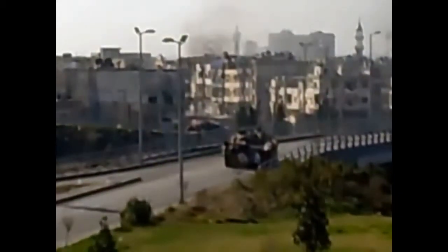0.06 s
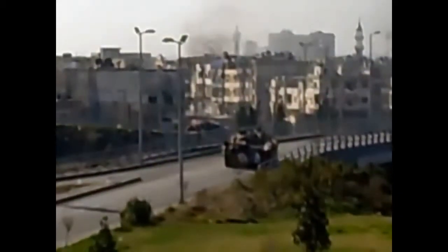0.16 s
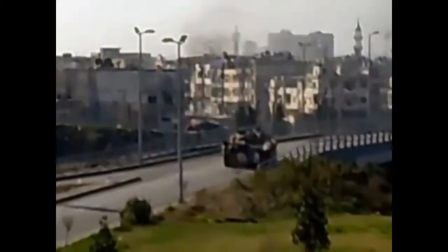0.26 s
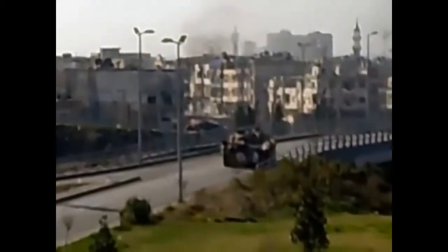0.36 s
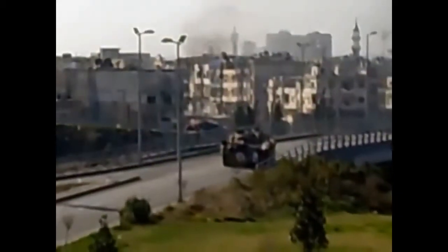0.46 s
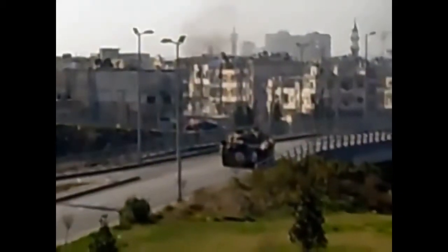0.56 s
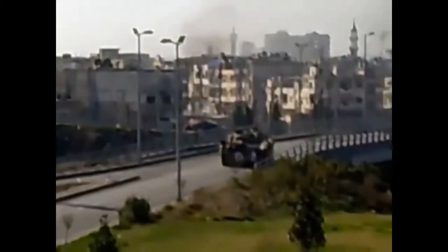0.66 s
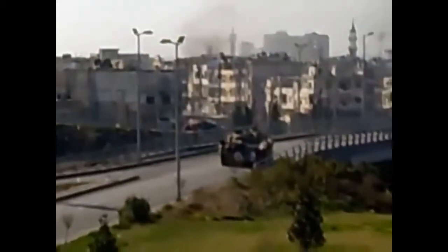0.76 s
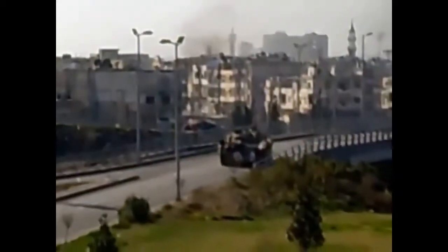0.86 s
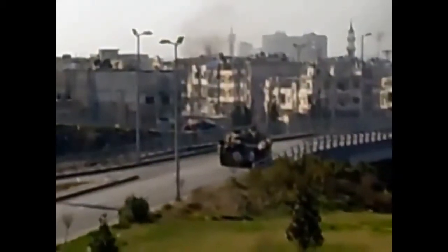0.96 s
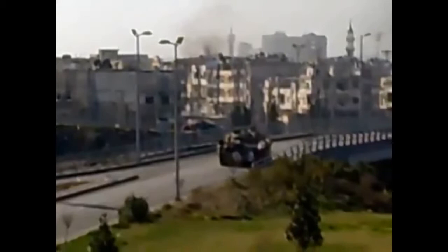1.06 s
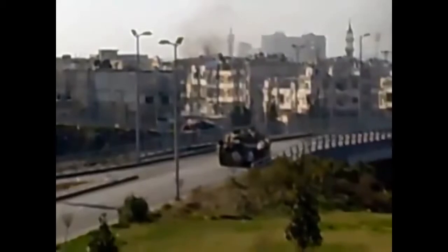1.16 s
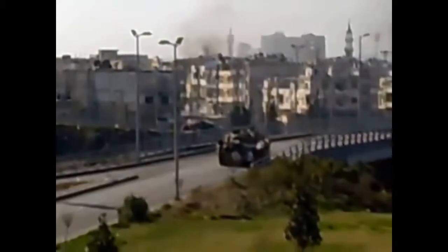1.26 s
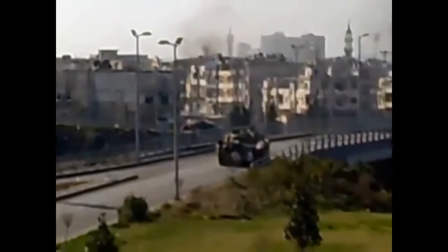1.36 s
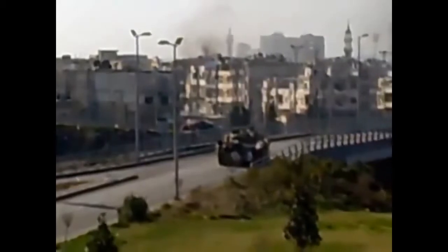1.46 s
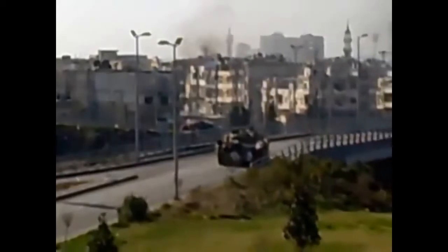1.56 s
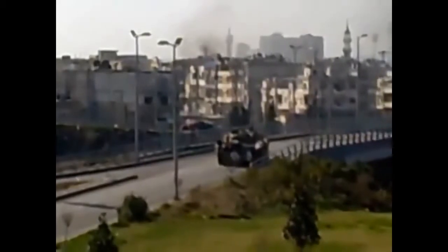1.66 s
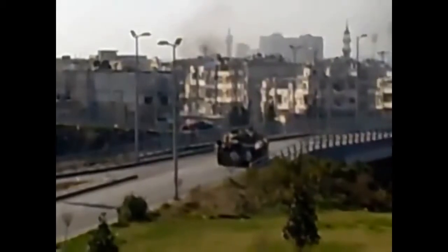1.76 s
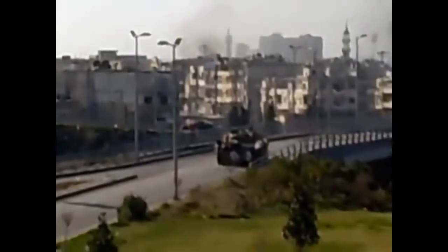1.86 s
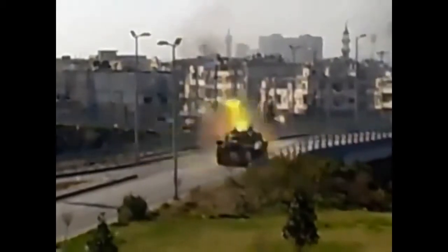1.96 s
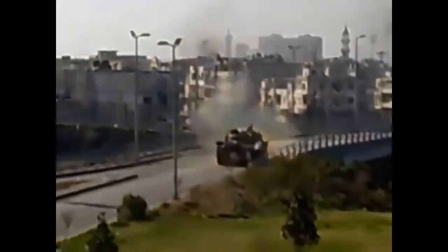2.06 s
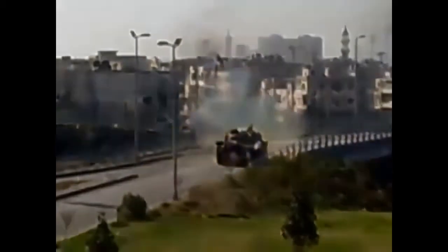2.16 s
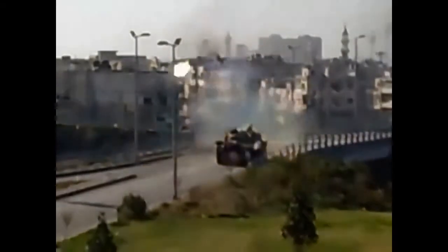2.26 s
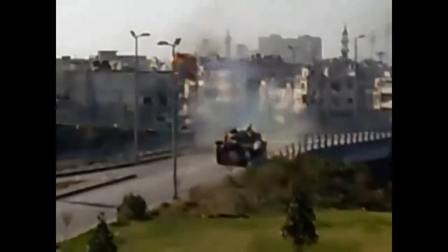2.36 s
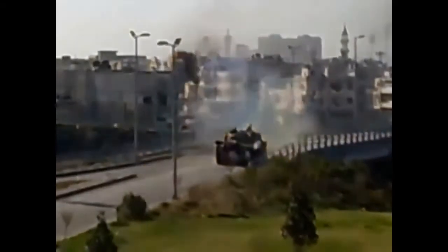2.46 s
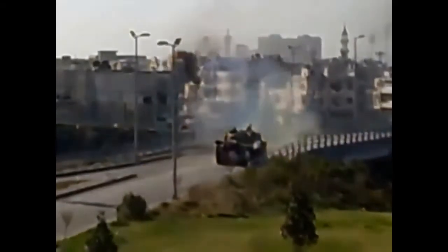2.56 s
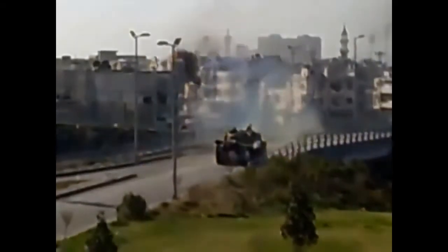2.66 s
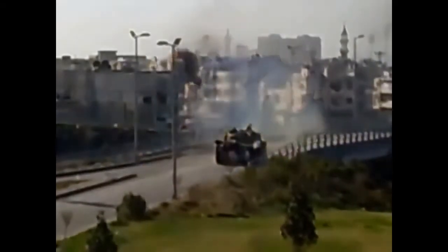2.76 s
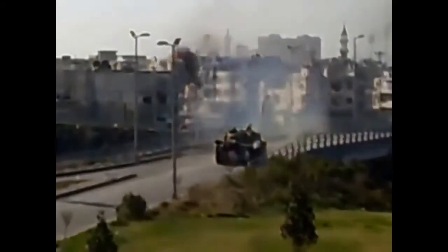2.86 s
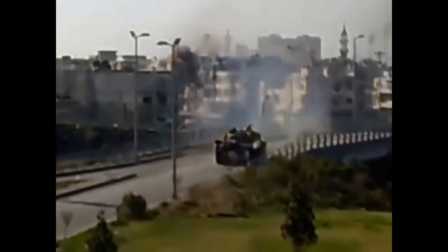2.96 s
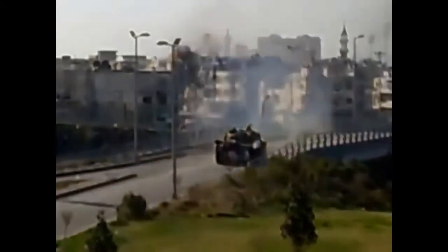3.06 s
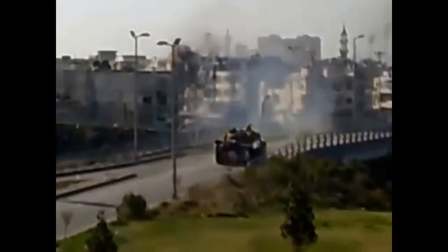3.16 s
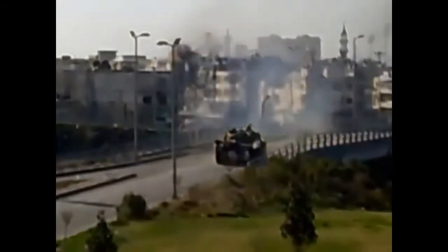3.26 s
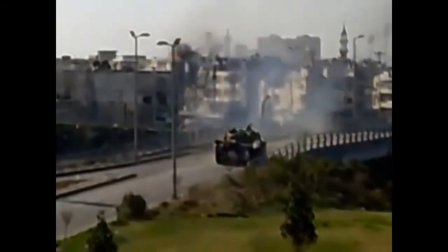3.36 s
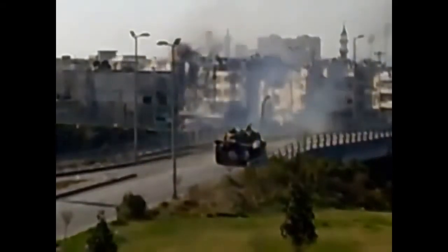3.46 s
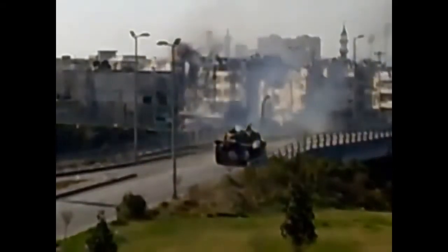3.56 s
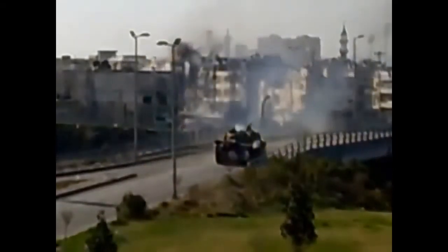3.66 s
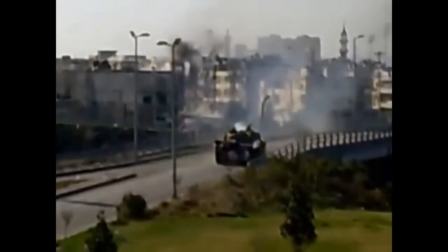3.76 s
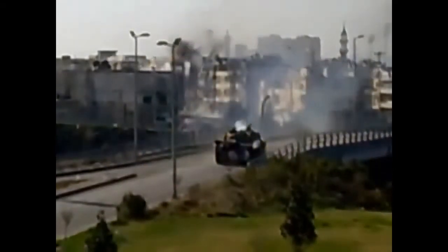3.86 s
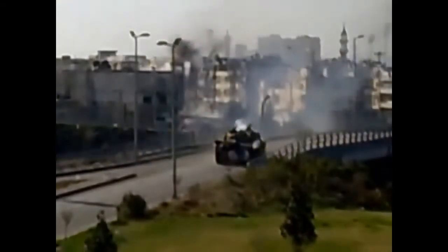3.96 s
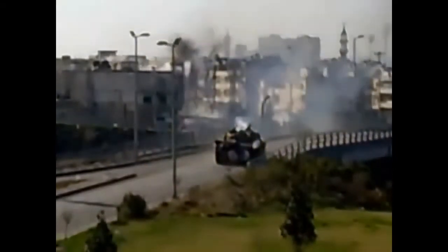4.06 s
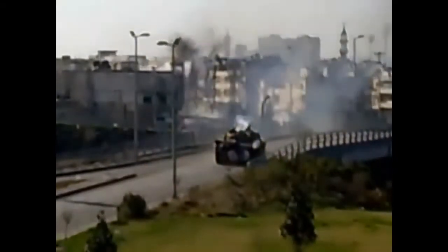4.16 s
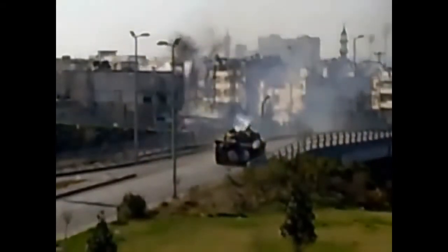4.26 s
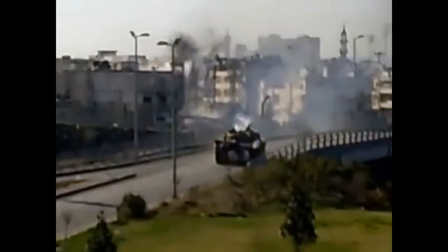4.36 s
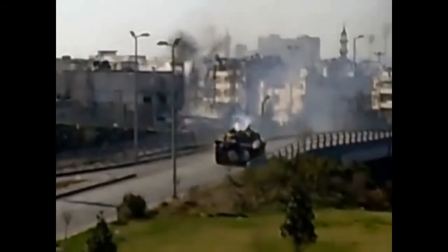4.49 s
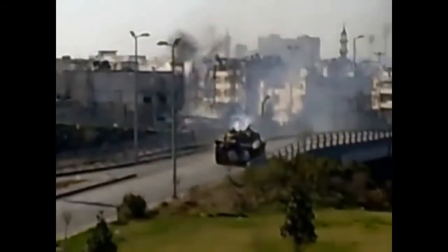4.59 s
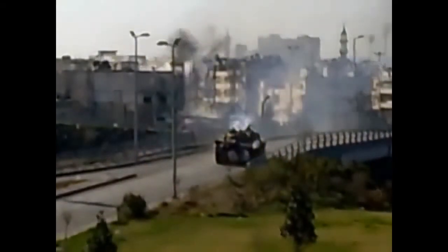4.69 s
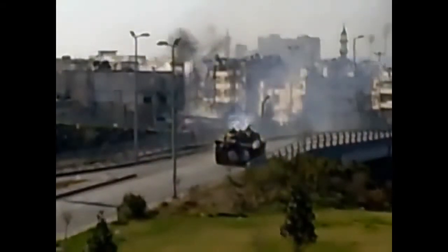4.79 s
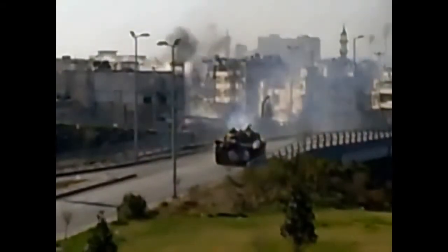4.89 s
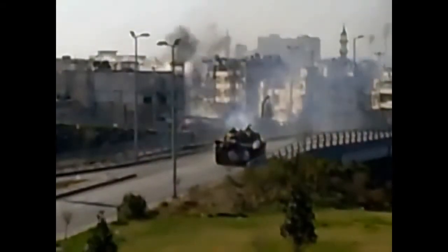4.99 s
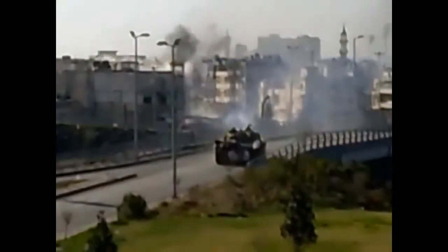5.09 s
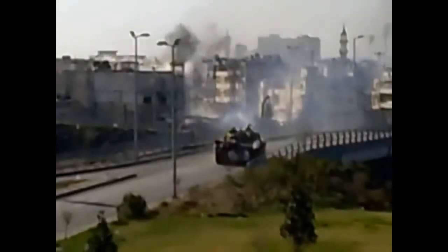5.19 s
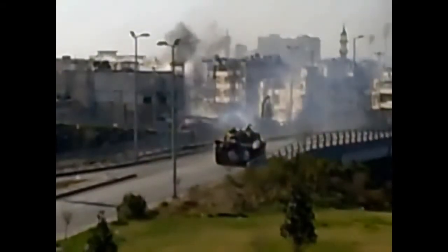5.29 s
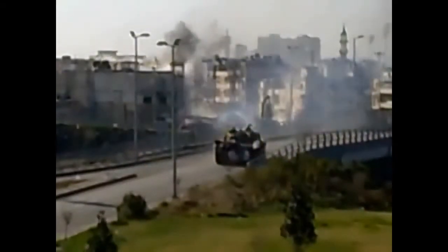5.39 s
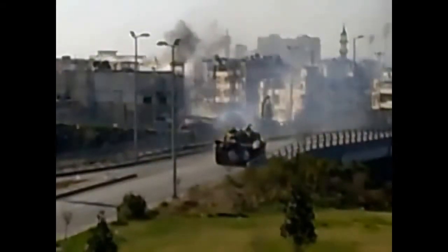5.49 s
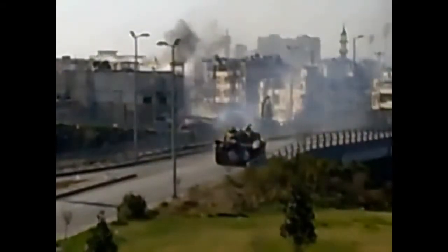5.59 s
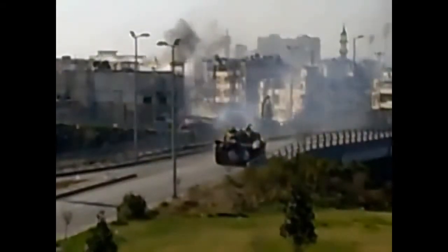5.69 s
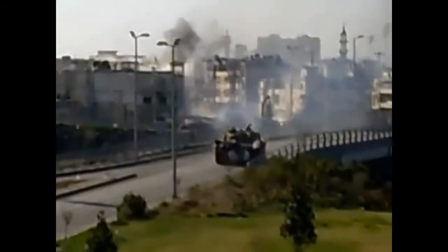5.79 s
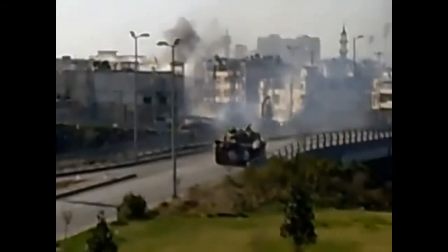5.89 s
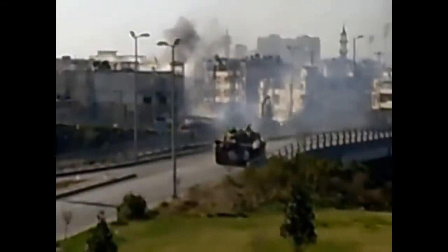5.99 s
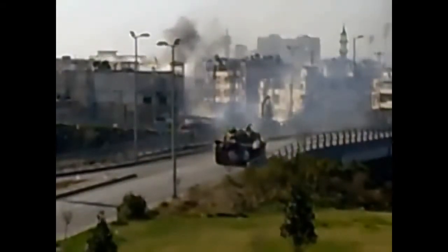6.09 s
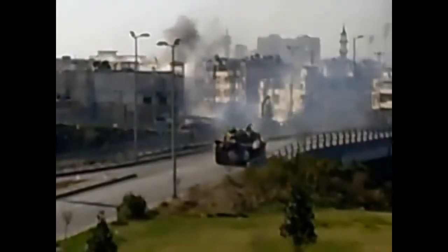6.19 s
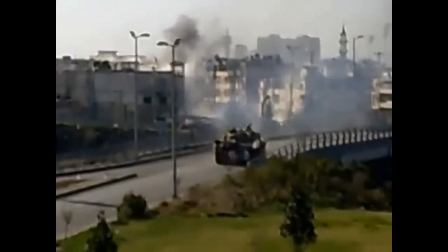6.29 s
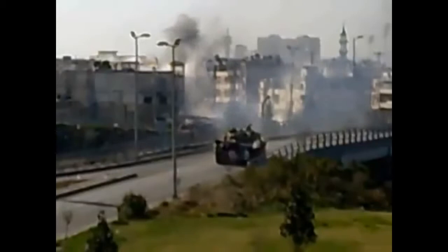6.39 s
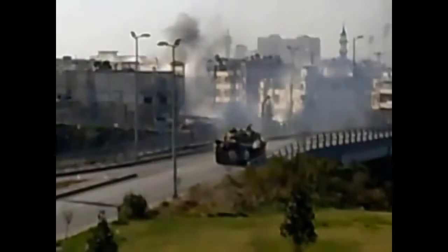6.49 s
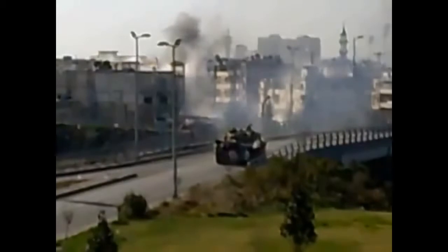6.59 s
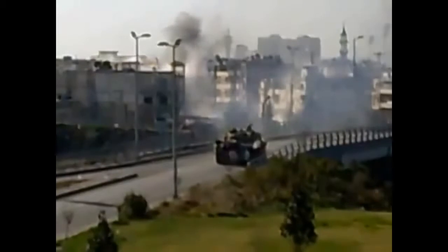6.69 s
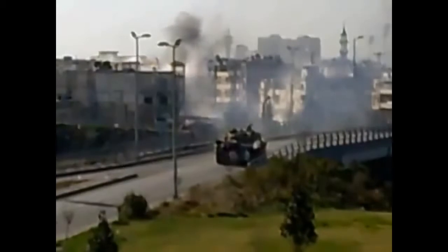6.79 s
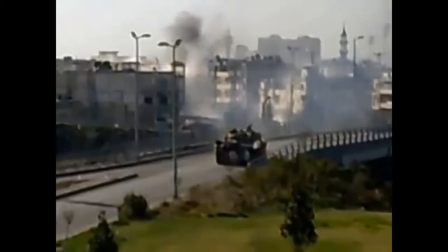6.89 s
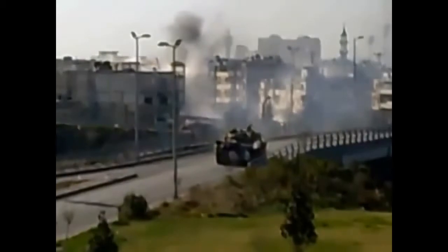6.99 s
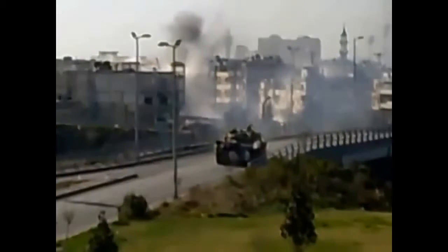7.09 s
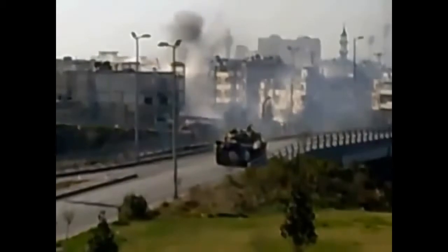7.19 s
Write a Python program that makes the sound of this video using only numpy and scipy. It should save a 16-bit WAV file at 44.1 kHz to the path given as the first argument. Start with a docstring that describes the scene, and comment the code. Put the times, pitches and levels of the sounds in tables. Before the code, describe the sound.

Low, fluttering gusts buffet the microphone over faint town noise, hiss and thin whine. After a lull come a muffled boom and a much sharper cannon blast, peaks flattened by overload. Hard reflections and further bursts follow in uneven clumps, with long, dulling rolls from the buildings. Quiet returns, then wind thumps hard at the very end.

```python
"""Wind buffets a microphone over faint town noise, whine and hiss, all scattered pulses, noise or sines.
A distant gun thuds, then a tank fires; its shell bursts further off: fast fronts with ringing reflections.
House fronts return each blast as a long roll of echo pulses over a deep rumble of filtered pulses.
The blasts overload the input stage, which flattens their peaks; late gusts thump the microphone again."""
import sys
import numpy as np
from scipy import signal
from scipy.fft import rfft, irfft
from scipy.io import wavfile
from scipy.ndimage import uniform_filter1d

SR = 44100
rng = np.random.default_rng(int(sys.argv[2]) if len(sys.argv) > 2 else 0)


def store_pcm(level_fs):
    """Save levels as 16-bit WAV."""
    pcm = np.round(np.clip(level_fs, -1, 1) * 32767).astype(np.int16)
    wavfile.write(sys.argv[1], SR, np.atleast_2d(pcm).T)


N = 319284  # samples


def undb(db):
    """Decibels to amplitude ratio."""
    return 10 ** (np.asarray(db) / 20)


def unit(x):
    """Scale to an RMS of 1."""
    return x / np.sqrt(np.mean(x ** 2))


def colour(x, points):
    """Causal filter through (hz, gain_db) points, from the folded cepstrum of the log gain."""
    size = 1 << 13
    hz, db = np.transpose(points)
    bin_hz = np.arange(size // 2 + 1) * SR / size
    log_gain = np.interp(np.log(bin_hz + 1), np.log(hz), db) * np.log(10) / 20
    cepstrum = irfft(log_gain)
    cepstrum[1:size // 2] *= 2
    cepstrum[size // 2 + 1:] = 0
    response = irfft(np.exp(rfft(cepstrum)))
    return signal.fftconvolve(x, response)[:len(x)]


def walk(rate_hz):
    """Random levels held 1 / rate_hz s and slewed twice; spread near 1."""
    k = int(SR / rate_hz)
    steps = np.repeat(rng.standard_normal(N // k + 1), k)
    return 1.3 * uniform_filter1d(uniform_filter1d(steps, k), k)[:N]


def pulses(rate_hz, spread_db):
    """Scattered pressure pulses of either sign; a positive spread makes a few far larger than the rest."""
    when, sign, size = rng.random((3, N))
    present = when < rate_hz / SR
    height = undb(-spread_db * np.log(1 - size))
    return unit(present * np.sign(sign - .5) * height)


def even(x, span_s):
    """Level held near 1 over spans of span_s, faster lumps kept."""
    k = int(span_s * SR)
    power = uniform_filter1d(uniform_filter1d(x ** 2, k), k)
    return x / np.sqrt(power)


def swell(start_s, level_db, hold_s, fall_db_s, rise_db_s):
    """Level in dB: a straight rise to start_s, a hold, a straight fall, or a climb if fall_db_s is negative."""
    t = np.arange(N) / SR - start_s
    return level_db + rise_db_s * np.minimum(t, 0) - fall_db_s * np.maximum(t - hold_s, 0)


def wind():
    """Eddies thump the microphone in bunches; strong gusts reach higher in pitch."""
    # gusts on the microphone: start_s, level_db, hold_s, fall_db_s
    gust_rows = [(0, -9.5, 0.0058, 107), (0.175, -13.5, 0.0084, 196), (0.246, -17, 0.0082, 137),
                 (0.34, -15.5, 0.076, 200), (0.412, -13, 0.026, 150), (0.495, -16, 0.024, 405),
                 (0.572, -17, 0.033, 500), (0.669, -9.5, 0.067, 464), (0.817, -9, 0.063, 247),
                 (0.919, -4, 0.0042, 203), (1.076, -17, 0.0089, 152), (1.248, -28.5, 0.012, 252),
                 (1.329, -31.5, 0.01, 504), (1.573, -27.5, 0.026, 58), (2.274, -19.5, 0.011, 89),
                 (2.277, -20, 0.0055, 281.5), (2.347, -5.5, 0.0063, 138), (2.53, -21, 0.011, 198),
                 (2.626, -18, 0.0066, 492), (2.664, -27.5, 0.022, 150), (2.755, -29, 0.009, 141),
                 (2.8, -25.5, 0.087, 289), (5.68, -22.5, 0.025, 412), (5.792, -19.5, 0.058, 61),
                 (6.046, -47, 0.0035, 500), (6.18, -32.5, 0.028, 400), (6.468, -30.5, 0.0057, 190.5),
                 (6.582, -47, 0.017, 470.5), (6.74, -29, 0.011, 185), (6.99, -22.5, 0.034, 230),
                 (7.039, -9, 0.045, 50)]
    # relative spectrum of the eddies: hz, density_db (per Hz)
    wind_colour = [(12, -44.5), (25, -1.5), (65, 1), (130, 0.5), (210, 0), (330, -7.5), (420, -10),
                   (750, -33), (3000, -57.5), (6600, -110)]
    edge_colour = [(200, -14.5), (600, 5.0), (1200, -15.5), (3000, -34.5), (6000, -70.5)]
    eddies_hz, gust_rise_db_s, calm_db = 700, 355.5, -59.5
    gust_db = np.max([swell(*row, gust_rise_db_s) for row in gust_rows], axis=0).clip(calm_db)
    eddies = colour(pulses(eddies_hz, spread_db=1.5), wind_colour)
    dull = even(undb(2.0 * walk(30)) * eddies, 0.07)
    edge = unit(colour(rng.standard_normal(N), edge_colour))
    return undb(gust_db) * dull + undb(2.7 * gust_db - 10.0) * edge + thumps()


def thumps():
    """One large eddy pushes the membrane and lets it swing back."""
    # hardest single thumps of wind: start_s, peak_db, pitch_hz
    thump_rows = [(0.252, -4.5, 110), (0.407, -2, 88), (0.59, -6.5, 200), (0.677, -2.5, 199),
                  (0.725, -24, 175), (0.807, -9, 153), (0.853, -1.5, 199), (0.878, -4.5, 175),
                  (0.914, 1.5, 206), (0.998, -2.5, 208), (1.062, -5, 130), (2.329, -14, 240),
                  (2.362, 0, 89), (2.451, -8.5, 80.4), (2.626, -13, 236), (2.851, -6, 138),
                  (5.858, -17, 184), (6.185, -13.5, 101), (6.999, -4.5, 131), (7.026, -2.5, 130),
                  (7.06, 1, 182), (7.1, 5.5, 240)]
    rise_cycles, fall_cycles = 0.24, 0.64
    out = np.zeros(N + SR)
    for (start_s, peak_db, hz), sign in zip(thump_rows, rng.choice([-1, 1], len(thump_rows))):
        cycles = np.arange(int(6 * fall_cycles / hz * SR)) / SR * hz
        envelope = (1 - np.exp(-(cycles / rise_cycles) ** 2)) * np.exp(-cycles / fall_cycles)
        push = np.sin(2 * np.pi * cycles) * envelope
        out[int(start_s * SR):][:len(cycles)] += sign * undb(peak_db) * push / np.abs(push).max()
    return out[:N]


def echo_bands():
    """Dense pulses, as of overlapping returns from many walls, split into body and two treble layers."""
    # spectrum of the pulses: hz, density_db (per Hz)
    echo_colour = [(60, -4.5), (150, -9), (260, -6.5), (430, 1), (560, -4.5), (742, -9), (1200, -13.5),
                   (1890, -18), (3060, -32), (4500, -49), (5500, -74.5), (6500, -84), (8000, -81.5),
                   (12000, -100)]
    x = colour(pulses(2500, spread_db=0.0), echo_colour)
    reference_band = signal.butter(4, [800, 1600], "band", fs=SR, output="sos")
    x = x / np.std(signal.sosfilt(reference_band, x))
    spectrum = rfft(x)
    octave = np.log2(np.arange(N // 2 + 1) * SR / N / 1200 + 1e-9)  # above 1200 Hz
    up = np.clip(octave / 1.25, 0, 1)
    top = np.clip(octave / 1.25 - 1, 0, 1)
    return [irfft(spectrum * share, N) for share in (1 - up, up - top, top)]


def mix(bands, level_db, treble_db):
    """Sum the layers; the top one follows a change of treble twice as steeply."""
    body, treble, top = bands
    return undb(level_db) * (body + undb(treble_db) * treble + undb(2 * treble_db) * top)


def roll():
    """Town noise, blast echoes and late wind rush in uneven clumps, each swell duller as it goes on."""
    # far town noise: start_s, level_db, treble_db
    town_rows = [(0, -54.5, 15), (0.299, -45.5, 0.5), (.9, -59.5, 8.5), (1.3, -57, 4), (1.51, -63.5, 4),
                 (1.545, -51, -7), (1.681, -45.5, 4.5), (1.75, -44.5, -1), (2.88, -62.5, 10.5)]
    # rolls of blast echoes; the 4.593 row a dull town murmur that slowly grows;
    # last two the mid-pitched rush of late wind gusts:
    # start_s, level_db, treble_db, rise_db_s, hold_s, fall_db_s (negative: climb)
    roll_rows = [(1.715, -16.5, -3.5, 911, 0.022, 104), (1.819, -32.5, -29, 304, 0.034, 60),
                 (1.898, -44.5, -27.5, 305, 0.03, 6), (2.897, -25.5, 8, 898.5, 0.51, 11.5),
                 (3.655, -30, 4.5, 161, 0.27, 12.5), (4.239, -24.5, 3.5, 900.5, 0.39, 19),
                 (4.593, -52, -24, 300, 0.88, -5.5), (5.832, -39, -1.5, 88, 0.029, 74.5),
                 (7.006, -40, -4, 902, .1, 4)]
    own_clump_db, common_clump_db, dulling_db_s = 1.1, 0.7, 6.5
    bands = [undb(own_clump_db * walk(28)) * band for band in echo_bands()]
    t = np.arange(N) / SR
    when_s, town_db, town_treble_db = np.transpose(town_rows)
    out = mix(bands, np.interp(t, when_s, town_db), np.interp(t, when_s, town_treble_db))
    for start_s, level_db, treble_db, rise_db_s, hold_s, fall_db_s in roll_rows:
        swell_db = swell(start_s, level_db, hold_s, fall_db_s, rise_db_s)
        out = out + mix(bands, swell_db, treble_db - dulling_db_s * np.maximum(t - start_s, 0))
    return undb(common_clump_db * walk(18)) * out


def rumble():
    """Over a steady far rumble, long waves bend round the houses, come late and stay, the deepest longest."""
    # rumble after each heavy blast: start_s, low_db, deep_db, hold_s (deep: half), fall_db_s (deep: x 0.59)
    rumble_rows = [(1.767, -18.5, -32.5, 0.31, 139.5), (2.896, -9.5, -15, 0.25, 14.5),
                   (3.393, -18, -33, 0.098, 12), (4.204, -38, -20, 0.41, 30)]
    # relative spectra of the low and deep parts: hz, density_db (per Hz)
    rumble_colour = [(40, -31), (70, -5), (105, -6), (180, -12.5), (260, -12), (400, -23.5), (700, -91)]
    deep_colour = [(12, -33), (22, 6.5), (45, 31), (65, 21), (120, -51)]
    rise_db_s, far_rumble_db, even_s = 597, -40.5, 0.12
    low, deep = undb(far_rumble_db), 0
    for start_s, low_db, deep_db, hold_s, fall_db_s in rumble_rows:
        low = low + undb(swell(start_s, low_db, hold_s, fall_db_s, rise_db_s))
        deep = deep + undb(swell(start_s, deep_db, hold_s / 2, 0.59 * fall_db_s, rise_db_s))
    deep = deep * undb(2 * walk(5))
    out = 0
    for gain, points in ((low, rumble_colour), (deep, deep_colour)):
        out = out + gain * even(colour(pulses(1500, spread_db=2.23), points), even_s)
    return out


def electronics(shots):
    """Hiss and a thin whine, faint wherever the shots are bright and loud."""
    # whine tones before flutter and fading: pitch_hz, level_db (RMS)
    whine_rows = [(6557, -70), (13108, -67)]
    # relative spectrum of the hiss: hz, density_db (per Hz)
    hiss_colour = [(1000, -8), (3000, -6), (7700, -1), (11000, 8.5), (13100, 14), (14500, 10.5),
                   (16000, -34.5)]
    t = np.arange(N) / SR
    whine = 0
    for hz, level_db in whine_rows:
        whine = whine + undb(level_db + 3 * walk(25)) * np.sqrt(2) * np.sin(2 * np.pi * hz * t)
    flicker = undb(2 * walk(25))
    hiss = [undb(-56.0) * flicker * unit(colour(rng.standard_normal(N), hiss_colour)) for _ in range(3)]
    # the second difference favours treble
    bright_power = uniform_filter1d(np.diff(shots, 2, prepend=[0, 0]) ** 2, size=2000)
    fade = 1 / (1 + bright_power / undb(-57) ** 2) ** 2
    # one hiss shared, one per channel at half amplitude
    return fade * (whine + hiss[0] + np.array(hiss[1:]) / 2)


def clipping_ticks():
    """Thin ticks where the overloaded recording clips: filtered noise gone in milliseconds."""
    # thin clipping ticks: start_s, peak_db, top_hz
    tick_rows = [(0.918, -34.5, 4500), (3.385, -41, 10000), (3.401, -34, 11000), (3.661, -37, 10000),
                 (3.829, -35, 14000), (4.231, -34, 14000), (4.629, -47, 6980)]
    decay_s = 0.0011
    out, t = np.zeros(N), np.arange(SR // 50) / SR
    grits = rng.standard_normal((len(tick_rows), len(t)))
    for (start_s, peak_db, top_hz), grit in zip(tick_rows, grits):
        band = signal.butter(3, [900, top_hz], "band", fs=SR, output="sos")
        tick = signal.sosfilt(band, grit * np.exp(-t / decay_s))
        out[int(start_s * SR):][:len(t)] += undb(peak_db) * tick / np.abs(tick).max()
    return out


def blasts():
    """A front with a short fizz, then near reflections that die away, treble first."""
    # blasts and single strong echoes: start_s, nominal_peak_db (ring starts 12 dB below), treble_db,
    # fizz_db, rise_s (time constant), ring_t60_s
    blast_rows = [(1.19, -29.5, -13, -80, 0.002, 0.17), (1.692, 7.5, -12, -21.5, 0.05, 0.38),
                  (1.815, -13, -20, -75, 0.0052, 0.16), (2.03, -27, -18, -85, 0.004, 0.065),
                  (2.888, 8.5, -12, -6, 0.018, 0.25), (2.898, 12, 13, -25, 0.0019, 0.022),
                  (2.923, -3.5, -10, -14, 0.011, 0.12), (2.976, -22, -6, -31, 0.015, 0.27),
                  (3.068, -2.5, -28, -37, 0.01, 0.23), (3.111, -2, 6, -27, 0.0085, 0.15),
                  (3.138, 2, 3, -28, 0.0023, 0.45), (3.341, -6.5, -23, -49.5, 0.0014, 0.19),
                  (3.382, 0, 0, -49, 0.0032, 0.097), (3.525, -14, -3, -65, 0.004, 0.043),
                  (3.586, -16, -10.5, -61, 0.004, 0.083), (3.656, -8, -17, -43, 0.0019, 0.082),
                  (3.814, 0.5, 5.5, -29, 0.013, 0.17), (4.035, -3.5, 0, -54, 0.011, 0.15),
                  (4.226, 5.5, 8.5, -22, 0.01, 0.17), (4.305, -6.5, 9, -75, 0.0028, 0.17),
                  (4.385, -4.5, 0.5, -70, 0.0045, 0.19), (4.453, -11.5, 5, -68, 0.0011, 0.18),
                  (4.504, -10, 7, -73, 0.0045, 0.15), (4.613, 1.5, 1, -58, 0.0099, 0.17),
                  (4.65, -5, 0, -75, 0.0046, 0.18), (4.707, -8, 1, -56, 0.0035, 0.13),
                  (4.761, -7.5, -8, -63, 0.0052, 0.11), (5.442, -5, -27, -74, 0.002, 0.035)]
    fizz_colour = [(2000, -53.5), (3500, -2.0), (6000, -4.0), (9500, -9.5), (11000, -30.5)]
    ring_crest_db, treble_fall_db_s = 12, 87.0
    bands, out = echo_bands(), np.zeros(N)
    fizz = unit(colour(pulses(1800, spread_db=-1), fizz_colour))
    for start_s, peak_db, treble_db, fizz_db, rise_s, t60_s in blast_rows:
        i = int(start_s * SR)
        t = np.arange(int(t60_s * SR)) / SR
        span = slice(i, i + len(t))
        fade_db = 60 * t / t60_s
        ring_db = peak_db - ring_crest_db - fade_db
        ring = mix([band[span] for band in bands], ring_db, treble_db - treble_fall_db_s * t)
        front = 1 - np.exp(-t / rise_s)
        out[span] += front * (ring + undb(fizz_db - 2 * fade_db) * fizz[span])
    return out


def booms():
    """A rough burst of low waves crowded round one broad resonance of the street."""
    # hollow body of heavy blasts and strongest echoes: start_s, level_db, centre_hz, hold_s, fall_db_s
    boom_rows = [(1.699, -2.5, 402, 0.049, 149), (2.893, 5.5, 433, 0.051, 903),
                 (2.969, -4.5, 150, 0.011, 794), (3.664, -3.5, 398, 0.0059, 399),
                 (3.811, -6, 370, 0.02, 297), (4.235, -14, 464, 0.016, 302), (4.625, -22, 485, 0.028, 201)]
    rise_db_s, skirt_db, even_s = 3999, -17, 0.006
    out = 0
    for start_s, level_db, hz, hold_s, fall_db_s in boom_rows:
        peak = [(hz / 4, 2 * skirt_db), (hz / 2, skirt_db), (hz, 0), (2 * hz, skirt_db), (8 * hz, 5 * skirt_db)]
        waves = even(colour(rng.standard_normal(N), peak), even_s)
        out = out + undb(swell(start_s, level_db, hold_s, fall_db_s, rise_db_s)) * waves
    return out


def flatten(x):
    """Overload: peaks bend over toward the ceiling."""
    ceiling, knee = 0.98, 6
    return x / (1 + np.abs(x / ceiling) ** knee) ** (1 / knee)


def scene():
    """Shots, rumble and wind in both channels, with opposite-signed treble and the electronics."""
    shots = roll() + blasts() + booms() + clipping_ticks()
    mid = shots + rumble() + wind()
    # two ports close together: the same bass, a little treble of their own
    side_colour = [(30, -85.5), (100, -56.5), (500, -55), (1200, -35.5), (2500, -28.5), (5000, -18.5)]
    side = colour(roll(), side_colour)
    return mid + np.array([side, -side]) + electronics(shots)


def record(dry):
    """Input stage flattens peaks, a coupling capacitor tilts the flat tops, left is duller, the top is cut."""
    # treble response of the microphone: hz, gain_db
    mic_top = [(6000, 0), (10000, -9.5), (13000, -12.5), (16000, -13)]
    duller_db, duller_band_hz, top_hz = -21, [800, 6000], 15500
    flat = [colour(x, mic_top) for x in flatten(dry)]
    capacitor = signal.butter(1, 14, "high", fs=SR, output="sos")
    flat = np.clip(signal.sosfilt(capacitor, flat), -1, 1)
    highs = signal.sosfiltfilt(signal.butter(1, duller_band_hz, "band", fs=SR, output="sos"), flat)
    # taken from the left, added to the right
    flat = flat + undb(duller_db) * highs * np.array([[-1], [1]])
    top_cut = signal.ellip(8, .2, 70, top_hz, fs=SR, output="sos")
    return signal.sosfilt(top_cut, np.clip(flat, -1, 1))


dry = scene()
out = record(dry)
store_pcm(out)
```